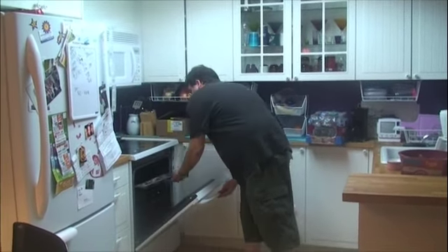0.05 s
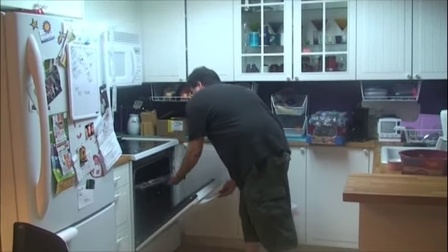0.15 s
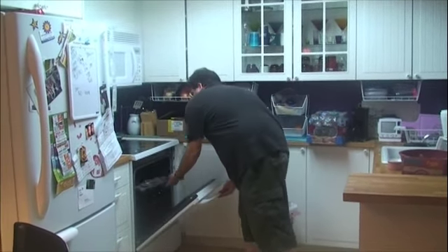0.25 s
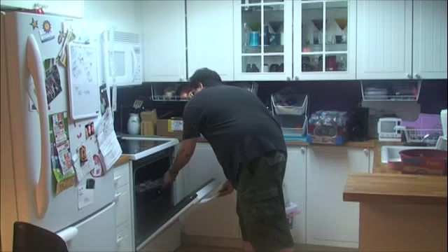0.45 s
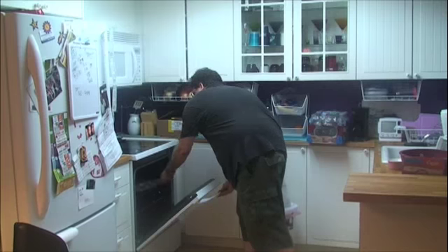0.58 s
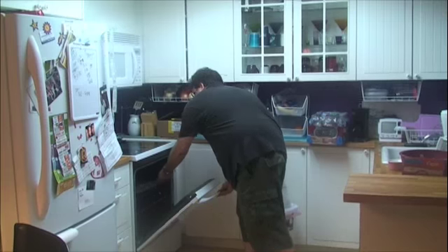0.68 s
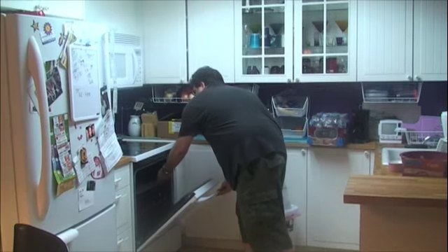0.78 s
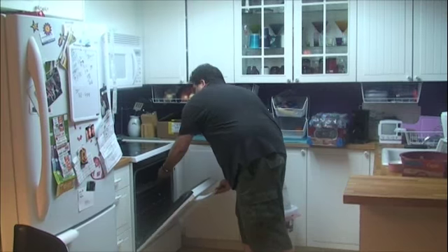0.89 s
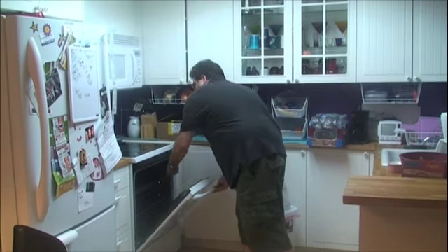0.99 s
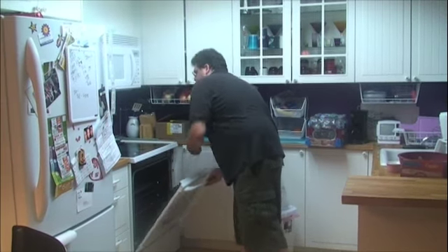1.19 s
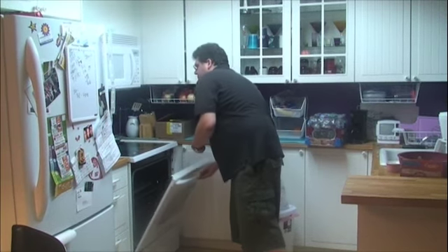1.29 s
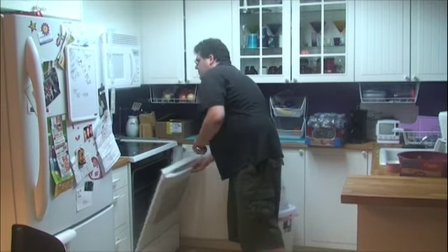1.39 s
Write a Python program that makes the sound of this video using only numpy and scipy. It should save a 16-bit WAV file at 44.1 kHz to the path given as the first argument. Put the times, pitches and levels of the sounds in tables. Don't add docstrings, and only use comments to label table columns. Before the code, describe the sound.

A thin metal baking tin clatters and scrapes onto a wire oven rack in a kitchen

```python
import sys
import numpy as np
from scipy import signal
from scipy.fft import rfft, irfft, next_fast_len
from scipy.io import wavfile

SR = 44100
rng = np.random.default_rng(int(sys.argv[2]) if len(sys.argv) > 2 else 0)


def inscribe(sig):
    pcm = np.round(np.clip(np.atleast_2d(sig).T, -1, 1) * 32767)
    wavfile.write(sys.argv[1], SR, pcm.astype(np.int16))


def gain_from_db(level_db):
    decades = np.asarray(level_db, float) / 20
    return 10 ** decades


N = 63945
T = np.arange(N) / SR
M = next_fast_len(N + SR // 2)
HZ = np.maximum(np.arange(M // 2 + 1) * SR / M, 1)
PLACES = 10
CONTACTS_PER_S = 4500

# (time [s], pressure [dB], hardness of contact [dB])
DRAG_PRESSURE = [(.205, -33.5, -3.5), (0.223, -21.5, -3.5), (.27, -22.5, -0.5), (0.357, -16.5, -7.5),
                 (0.409, -25.5, -12), (0.443, -21.5, -32), (.452, -13.5, 1), (.53, -15.5, 2),
                 (.6, -19.5, -0.5), (0.628, -19, 4.5), (0.719, -25, -7), (.821, -39.5, -18),
                 (0.826, -29, 3), (.895, -26, -8.5), (.91, -26, -2.5), (1.0, -17.5, -2), (1.04, -26.5, -16),
                 (1.199, -48, -44)]
# (frequency [Hz], level [dB per Hz])
SHEET_LEVEL = [(41, -53), (70, -24.5), (351, -0.5), (376, -0.5), (892, -3), (1760, -2), (2980, -7.5),
               (11400, -18.5), (16000, -15.5)]
# (frequency [Hz], ring time [s])
SHEET_RING = [(150, 0.21), (1000, 0.14), (4000, 0.031), (14000, 0.01)]
# (time [s], peak [dB], chatter length [s], brightness [dB per octave])
LANDING_HITS = [
    (.2062, -12.5, 0.05, 1),
    (.2223, -19, 0.007, -9),
    (0.4464, -8.5, 0.026, 1.5),
]
# (time [s], peak [dB], chatter length [s], brightness [dB per octave])
WIRE_BUMPS = [
    (0.2085, -22, 0.09, 0),
    (0.4495, -13, 0.047, 0),
    (.612, -8.5, 0.033, 0),
    (0.824, -13.5, 0.084, 0),
    (0.9049, -12.5, 0.013, 0),
    (0.9614, -12.5, 0.032, 0.38),
]
JOLT_BAND = [1100, 2800]
# (frequency [Hz], level [dB], ring time [s])
RIM_TONES = [(1245, -2.5, 0.032), (2360, -5, 0.065), (3530, -8.5, 0.03), (4454, 3.5, 0.015),
             (4850, -4, .06), (5380, -13, 0.065), (5560, -1, 0.027), (7000, 3, 0.029), (7290, -2.5, 0.024),
             (8470, -13, .02), (10780, -2.5, 0.019), (11300, -4.5, 0.014), (13000, -4, 0.017),
             (15400, 8, 0.017)]
# (frequency [Hz], level [dB], ring time [s])
WIRE_TONES = [(256, -29, .15), (385, -27, .2), (555, -23, .2), (1084, -24, .1), (1210, -23, .1),
              (1413, -24, .1), (1785, -21, .11), (2150, -18, .13), (2378, -21, .11), (2499, -22, .11),
              (3415, -22, .13), (4720, -26, .08), (6500, -26, .09), (8250, -30, .09)]
# (time [s], length [s], frequency [Hz], level [dB])
SINGING_WIRES = [(.614, .03, 1768, -22), (.59, .14, 384, -26), (.68, .025, 3415, -30),
                 (.62, .12, 3415, -37), (.655, .07, 1788, -27), (.905, .035, 1414, -22),
                 (.943, .02, 1775, -23), (.995, .015, 1785, -23), (.59, .06, 8200, -43),
                 (.83, .04, 8350, -43), (1.05, .13, 1790, -41), (.23, .04, 235, -36), (.98, .04, 295, -33),
                 (1.12, .35, 702, -48), (1.11, .24, 570, -45), (.448, .04, 1212, -22),
                 (.46, .04, 1410, -25), (.9, .04, 3750, -33), (.965, .07, 6500, -38), (1.04, .1, 3410, -44),
                 (1.2, .07, 190, -46)]
# (frequency [Hz], time [s])
ROOM_RING = [(150, 0.56), (700, 0.85), (2500, 0.57), (8000, 0.46), (15000, 0.067)]
# (frequency [Hz], likeness [-1 to 1])
METAL_LIKENESS = [(60, .6), (130, .93), (300, .97), (1400, .945), (3100, .86), (6800, .62), (15000, .55)]
# (frequency [Hz], left minus right [dB])
LEFT_RIGHT_TILT = [(60, -7), (200, -7.5), (700, -2.5), (1500, -1.5), (4400, -5), (8000, -6), (11500, 4)]
# (frequency [Hz], lead [radians])
LEFT_PHASE = [(200, 0), (2000, -.25), (4500, -.5), (10000, 0)]
# (frequency [Hz], level [dB per Hz])
HUSH_LEVEL = [(13, 3), (22, -0.5), (85, -11.5), (122, -15.5), (152, -9), (242, -6), (961, -14.5),
              (3320, -25), (16000, -32)]
# (frequency [Hz], likeness [-1 to 1])
HUSH_LIKENESS = [(60, 0.17), (240, 0.36), (950, 0.6), (3770, 0.58), (15000, -0.42)]
# (frequency [Hz], level [dB], width [Hz])
FRIDGE_HUMS = [
    (119, -53, 5),
    (274.5, -60, 14),
]


def rms_one(x):
    return x / np.sqrt(np.mean(x ** 2) + 1e-20)


def at_hz(points, hz):
    table = np.array(points)
    return np.interp(np.log(hz), np.log(table[:, 0]), table[:, 1])


def drift(rate):
    r = np.exp(-2 * np.pi * rate / SR)
    wander = signal.lfilter([1], [1, -2 * r, r * r], rng.standard_normal(2 * N))
    return rms_one(wander[N:])


def resonate(x, hz, t60):
    r = gain_from_db(-60 / (t60 * SR))
    w = 2 * np.pi * hz / SR
    return signal.lfilter([0, np.sin(w)], [1, -2 * r * np.cos(w), r * r], x + 1e-18)


def band_filter(x, order, hz, kind):
    return signal.sosfilt(signal.butter(order, hz, kind, fs=SR, output="sos"), x)


def clicks(per_s):
    spread_db, clump_db = 2.2, 1.2
    sizes = gain_from_db(spread_db * np.minimum(rng.exponential(1, N), 5)) * rng.choice([-1, 1], N)
    touching = rng.random(N) < per_s / SR
    return rms_one(sizes * touching * gain_from_db(clump_db * drift(49)))


def dying(start_s, length_s):
    return (T >= start_s) * np.exp(-np.maximum(T - start_s, 0) / length_s)


def sheet_response(count=800):
    hz = 70 + 15900 * ((np.arange(count) + rng.random(count)) / count) ** 1.6
    t60 = at_hz(SHEET_RING, hz) * rng.uniform(.6, 1.4, count)
    size = gain_from_db(at_hz(SHEET_LEVEL, hz)) * np.sqrt(hz ** .375 / t60)
    size = size * rng.standard_normal((PLACES, count))
    t = T[:SR // 6]
    fading = np.exp(-np.log(1000) * np.outer(1 / t60, t))
    out = size @ (np.sin(2 * np.pi * np.outer(hz, t)) * fading)
    return out / np.sqrt(np.mean(np.sum(out ** 2, axis=1)))


def bump_jolts(place):
    force_db = -6
    shape = sum(gain_from_db(db + force_db) * dying(s, length) for s, db, length, _ in WIRE_BUMPS)
    return band_filter(shape * clicks(CONTACTS_PER_S) * place, 1, JOLT_BAND, "band")


def drag():
    start_s, wander_per_s, wander_db = .2055, 12, 4.0
    soft_hz, hard_share_db, sheet_db = 3460, 1, -.5
    s, db, hard_db = np.transpose(DRAG_PRESSURE)
    force = clicks(CONTACTS_PER_S) * gain_from_db(np.interp(T, s, db)) * (T > start_s) * (T < s[-1])
    place = rng.integers(0, PLACES, N) == np.arange(PLACES)[:, None]
    wander = [gain_from_db(wander_db * drift(wander_per_s)) for _ in place]
    force = force * place * wander * gain_from_db(-wander_db ** 2 / 8.7)
    hardness = gain_from_db(hard_share_db + np.interp(T, s, hard_db))
    soft = band_filter(force, 2, soft_hz, "low")
    hard = band_filter(force * hardness, 2, soft_hz, "high")
    push = soft - hard + bump_jolts(place)
    out = gain_from_db(sheet_db) * signal.fftconvolve(push, sheet_response(), axes=1)[:, :N]
    for k, (hz, db, t60) in enumerate(WIRE_TONES):
        touch = force[k % PLACES] + force[(k + 3) % PLACES]
        out[k % PLACES] += gain_from_db(db - 22) * resonate(touch, hz, t60)
    return out


def chatter(hits, modes):
    out = np.zeros(N)
    touches = [clicks(1500) for _ in range(4)]
    shapes = np.array([dying(s, length) for s, _, length, _ in hits])
    _, peak_db, _, tilt_db = np.transpose(hits)
    for k, (hz, db, t60) in enumerate(modes):
        strength = gain_from_db(peak_db + tilt_db * np.log2(hz / 3000))
        out += gain_from_db(db) * resonate(strength @ shapes * touches[k % 4], hz, t60)
    return out


def landings():
    rim_db, wires_db = -32, -20
    return gain_from_db(rim_db) * chatter(LANDING_HITS, RIM_TONES) + gain_from_db(wires_db) * chatter(WIRE_BUMPS, WIRE_TONES)


def sings():
    rise_s, t60_s, wobble_db = .004, .07, 2.0
    out = np.zeros(N)
    for s, length, hz, db in SINGING_WIRES:
        rise = np.clip((T - s) / rise_s, 0, 1)
        fall = gain_from_db(-60 * np.maximum(T - s - length, 0) / t60_s)
        level = gain_from_db(db + 3 + wobble_db * drift(30))
        out += rise * fall * level * np.sin(2 * np.pi * hz * T + .5 * drift(12))
    return out


def stereo(mid, side, likeness):
    alike = np.clip(at_hz(likeness, HZ), -.9, .99)
    return np.sqrt((1 + alike) / 2) * mid + np.sqrt((1 - alike) / 2) * side * [[1], [-1]]


def room_tail(count, t):
    white = rng.standard_normal((count, len(t)))
    edges = 60 * 2 ** np.arange(0, 8.1, 1)
    tail = np.zeros_like(white)
    for k, (lo, hi) in enumerate(zip(edges, edges[1:] * 1.05)):
        fading = gain_from_db(-60 * t / at_hz(ROOM_RING, np.sqrt(lo * hi)))
        tail += band_filter(white, 1, [lo, hi], "band") * fading * (-1) ** k
    return tail


def kitchen(x):
    room_db, gap_s = -6, 0.0032
    t, paths, dry_spectrum = T[:SR // 2], [], rfft(x, M)
    for direct in (1, 0):
        tail = room_tail(len(x), t)
        tail *= np.clip(t / gap_s - direct, 0, 1)
        tail *= gain_from_db(room_db * direct) / np.sqrt(np.sum(tail ** 2) / len(x))
        tail[:, 0] += direct
        strength = np.sqrt(np.sum(tail ** 2) / len(x))
        paths.append(np.sum(dry_spectrum * rfft(tail, M), axis=0) / strength)
    return stereo(*paths, METAL_LIKENESS)


def narrow(hz, width_hz):
    t60 = 2.2 / width_hz
    once = resonate(rng.standard_normal(2 * N), hz, t60)
    return rms_one(resonate(once, hz, t60)[N:])


def whistle():
    from_s, rise_s, left_db = .9, .2, 9
    swell = np.clip((T - from_s) / rise_s, 0, 1)
    sides = [[gain_from_db(left_db / 2)], [gain_from_db(-left_db / 2)]]
    return gain_from_db(-63) * swell * narrow(10826, 330) * sides


def screen_whine():
    return gain_from_db(-66) * narrow(15735, 4)


def background():
    hush_db = -47
    shaped = rfft(rng.standard_normal((2, M))) * gain_from_db(at_hz(HUSH_LEVEL, HZ)) * (HZ > 18)
    mid, side = (rfft(gain_from_db(hush_db) * rms_one(irfft(v, M))) for v in shaped)
    hums = sum(gain_from_db(db) * narrow(hz, width) for hz, db, width in FRIDGE_HUMS)
    return stereo(mid, side, HUSH_LIKENESS) + rfft(hums, M)


def left_right_balance():
    left_cut_hz, left_cut_db = 11750, -38
    right_cut_hz, right_cut_db = 14300, -17
    tilt = at_hz(LEFT_RIGHT_TILT, HZ) / 2
    left = gain_from_db(tilt + left_cut_db * (HZ > left_cut_hz)) * np.exp(1j * at_hz(LEFT_PHASE, HZ))
    right = gain_from_db(-tilt + right_cut_db * (HZ > right_cut_hz))
    return np.array([left, right]) * (HZ < 16000)


def scene():
    tones = sings()
    sources = np.vstack([drag(), landings(), gain_from_db(-7) * tones])
    metal = kitchen(sources) + rfft(tones, M) / 2
    heard = irfft((metal + background()) * left_right_balance(), M)[:, :N]
    return heard + whistle() + screen_whine()


def top_cut(x):
    return signal.sosfilt(signal.butter(12, 16310, fs=SR, output="sos"), x)


def record(dry):
    mix = np.clip(dry, -1, 1)
    return top_cut(mix)


dry = scene()
out = record(dry)
inscribe(out)
```